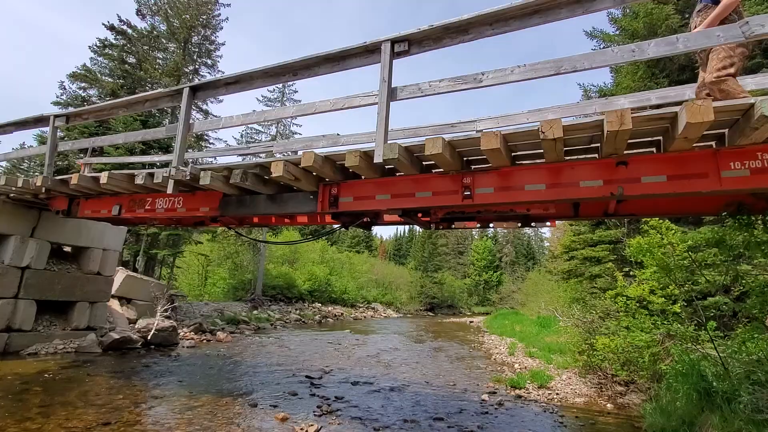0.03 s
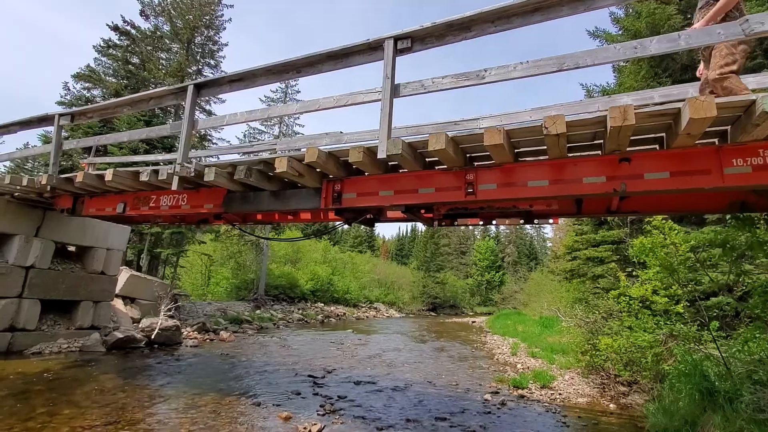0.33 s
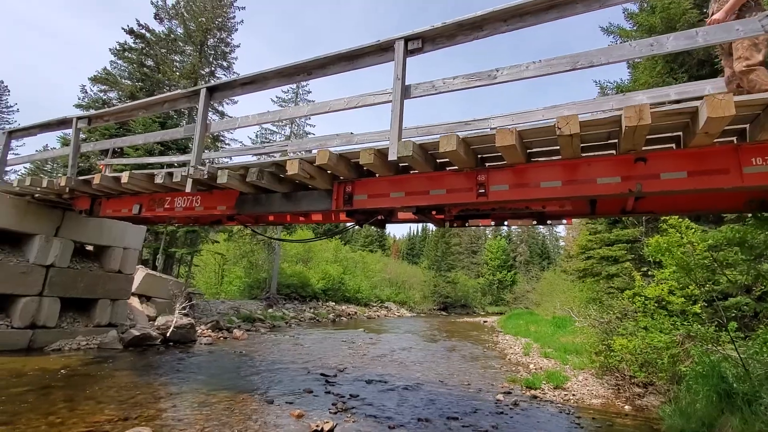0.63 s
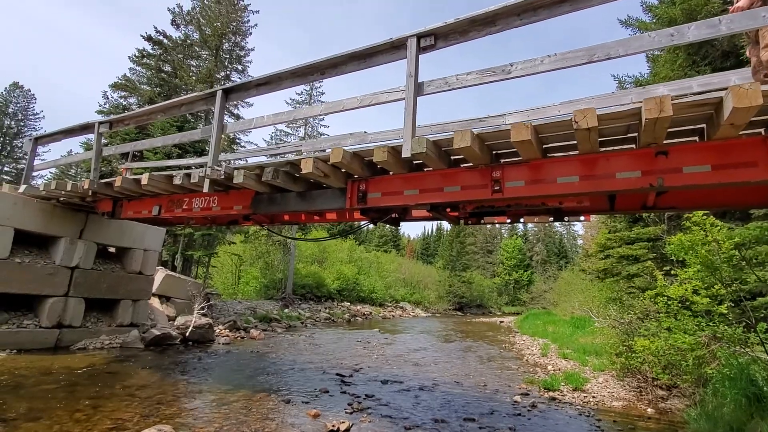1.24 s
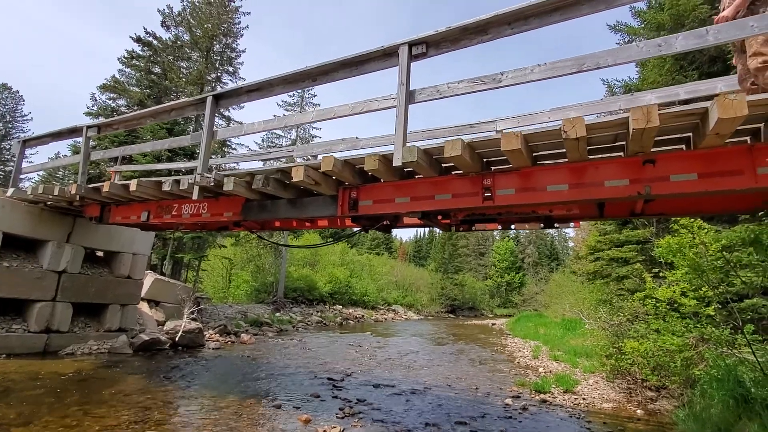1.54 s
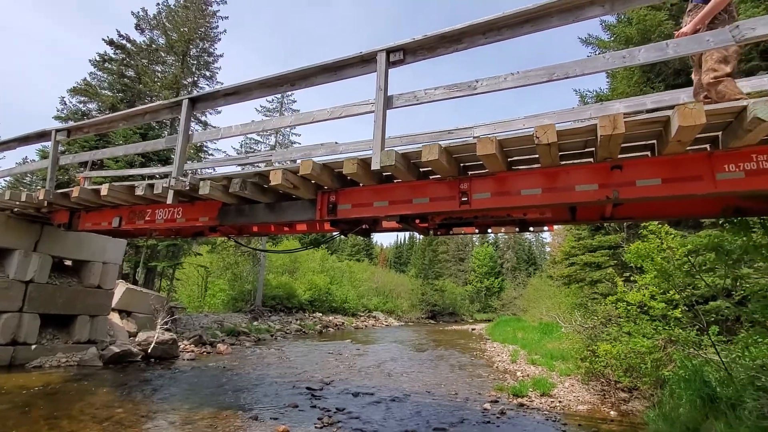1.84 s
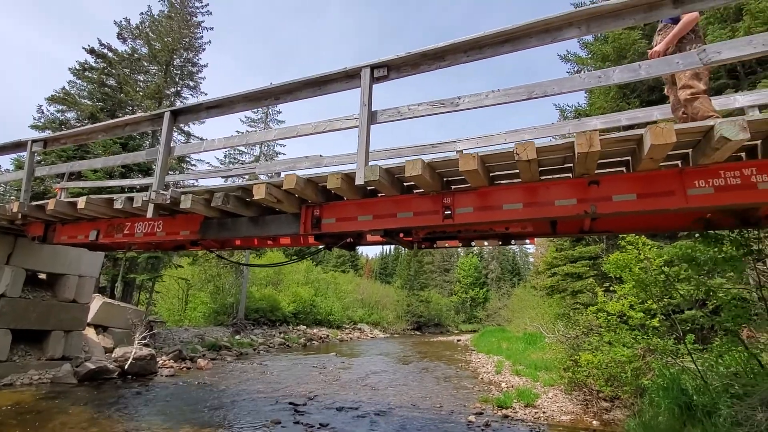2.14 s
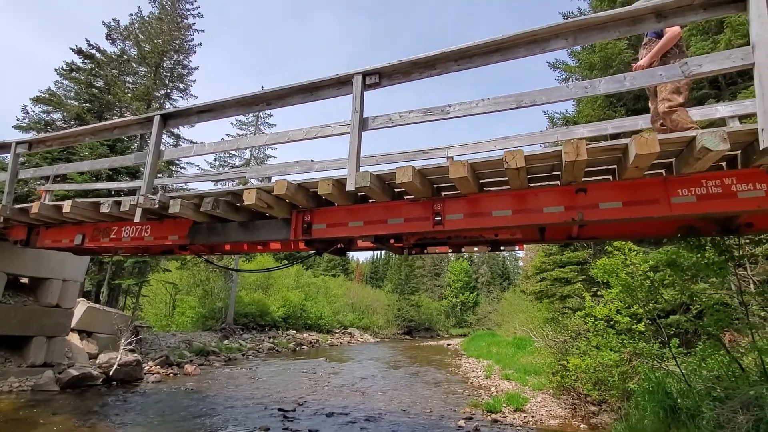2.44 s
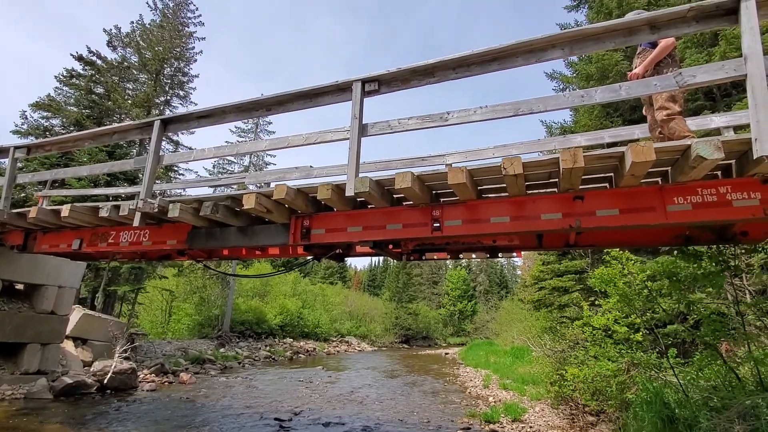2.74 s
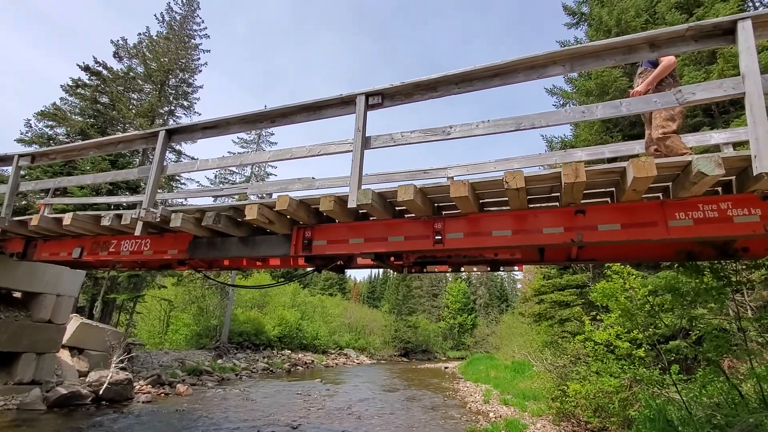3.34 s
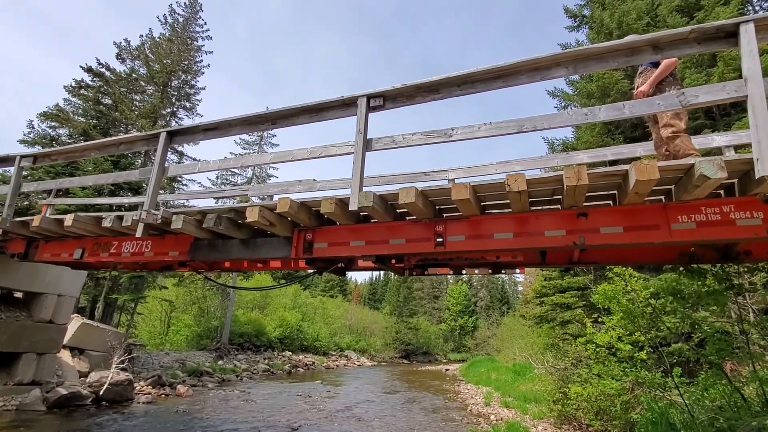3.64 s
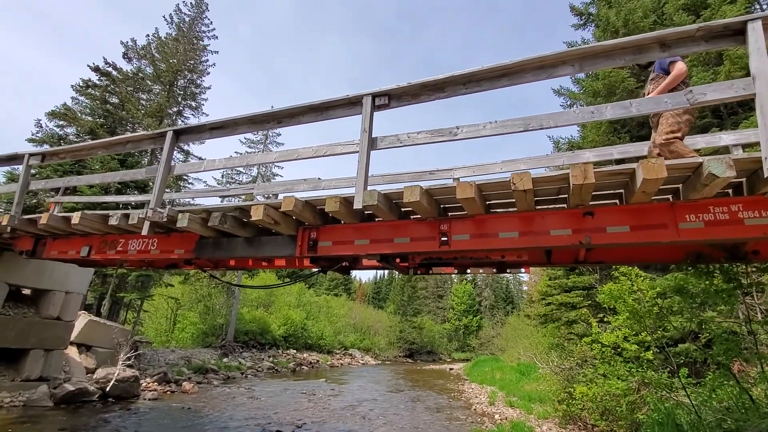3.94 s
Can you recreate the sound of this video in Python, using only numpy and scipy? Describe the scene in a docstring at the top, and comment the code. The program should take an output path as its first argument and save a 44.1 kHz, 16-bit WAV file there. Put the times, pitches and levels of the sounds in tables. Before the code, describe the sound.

A shallow stream ripples over stones throughout, a steady rush with small bubbles and spray. Light wind rumbles and thumps on the microphone, and a faint high hiss, perhaps an insect, pulses twice a second. Sharp close taps come at about 0.8, 1.6 and 2.6 seconds, the second loudest. A distant bird calls thinly three times around 2 seconds, then a small bird whistles high from 3.1 to 3.9.

```python
"""Under a bridge, a shallow stream ripples over stones: a rush full of ringing bubbles and ticks of
spray. Light wind rumbles and thumps on the two microphone openings. A faint high hiss, perhaps an
insect, pulses twice a second, and three sharp taps sound close by. A far bird gives three thin calls,
then a small bird whistles one high phrase near the end."""
import sys
import numpy as np
from scipy import signal
from scipy.fft import rfft, irfft, next_fast_len
from scipy.io import wavfile
from scipy.ndimage import uniform_filter1d, map_coordinates

SR = 44100
rng = np.random.default_rng(int(sys.argv[2]) if len(sys.argv) > 2 else 0)


def digitize_waveform(pressure):
    """Quantize a signal to 16-bit integers and store it at the path in sys.argv[1].

    Rows of a 2-D input are taken as channels; values are limited to [-1, 1].
    """
    field = np.atleast_2d(pressure).T
    bounded = np.clip(field, -1, 1)
    quanta = np.round(bounded * 32767).astype(np.int16)
    wavfile.write(sys.argv[1], SR, quanta)


N = 176400
TOP_HZ = 15920  # upper limit of the treble


def amp(db):
    """Turn decibels into a number to multiply by."""
    return 10 ** (np.asarray(db) / 20)


def unit(x):
    """Scale a signal so that its average strength (rms) is 1."""
    return x / np.sqrt(np.mean(x ** 2) + 1e-20)


def along(points, hz, column=1):
    """Read a table between its frequencies, on a scale of octaves."""
    columns = np.transpose(points)
    return np.interp(np.log(hz + 1), np.log(columns[0] + 1), columns[column])


def curves(rows):
    """Join a table's points in time with straight lines, one curve per value column."""
    times, *columns = np.transpose(rows)
    return np.array([np.interp(np.arange(N) / SR, times, column) for column in columns])


def wobble(rate):
    """A smooth curve through `rate` random values a second."""
    return map_coordinates(rng.standard_normal(int(N * rate / SR) + 4), [np.arange(N) * rate / SR])


def filtered(x, response):
    """Change the strength and timing of each frequency in x by response(hz)."""
    size = next_fast_len(N + SR // 2)
    return irfft(rfft(x, size) * response(np.fft.rfftfreq(size, 1 / SR)), size)[..., :N]


def noise(tone):
    """Separate left and right noise, shaped by a table of (frequency [Hz], level [dB])."""
    return unit(filtered(rng.standard_normal((2, N)), lambda hz: amp(along(tone, hz))))


def pan(db):
    """Left and right gains that make the left louder by db."""
    return amp([[db / 2], [-db / 2]])


def fade(t, t60):
    """Die away by 60 dB every t60 seconds."""
    return np.exp(-np.log(1000) * t / t60)


def swell(t, width):
    """A smooth rise and fall, at 61% of its peak `width` seconds either side of t = 0."""
    return np.exp(-(t / width) ** 2 / 2)


def add(out, start, sound):
    """Mix a sound in at `start` seconds."""
    part = out[..., round(start * SR):][..., :sound.shape[-1]]
    part += sound[..., :part.shape[-1]]


def bubble(t, hz, cycles, rise):
    """Trapped air rings for about `cycles` vibrations, its pitch rising as it dies."""
    life = cycles / hz
    ring = np.sin(2 * np.pi * hz * t * (1 + rise * t / life / 2))
    onset = 1 - np.exp(-20 * t / life)
    return ring * fade(t, life) * onset


def bubble_cloud(per_s, hz, spread, cycles, scatter_db, rise, samples):
    """Many tiny bubbles ring at random times, pitches and strengths."""
    draws = np.random.default_rng(rng.integers(2 ** 31)).random((int(per_s * N / SR), 3))
    when, how_high, how_loud = np.hsplit(draws, 3)
    pitch = np.clip(hz * np.exp(spread * (2 * how_high - 1)), 200, TOP_HZ)
    strength = amp(-scatter_db * np.log(1 - .99 * how_loud)) * pitch / hz  # a few stand out
    positions = (when * N).astype(int) + np.arange(samples)
    rings = strength * bubble(np.arange(samples) / SR, pitch, cycles, rise)
    return unit(np.bincount(positions.ravel(), rings.ravel(), N)[:N])


def ripples(patchy_db, bubble_db=-11, spray_db=-6.5):
    """Water breaks over stones: an uneven rush, bubbles and ticks of spray."""
    hiss = signal.stft(rng.standard_normal(N), nperseg=256)[2]  # a grid of frequency by time
    patches = uniform_filter1d(rng.standard_normal(hiss.shape), 5, axis=0)
    patches = unit(uniform_filter1d(patches, 10, axis=1))
    rush = unit(signal.istft(hiss * amp(patchy_db * patches), nperseg=256)[1][:N])
    bubbles = bubble_cloud(per_s=700, hz=1692, spread=1.088, cycles=26, scatter_db=3, rise=0.24,
                           samples=1200)
    spray = bubble_cloud(per_s=500, hz=10000, spread=0.35, cycles=3, scatter_db=4, rise=0, samples=64)
    return unit(rush + amp(bubble_db) * bubbles + amp(spray_db) * spray)


def stream(gain_db=4.5, surge_db=0.41, low_cut_hz=151, fizz_hz=5000, flicker_db=0.97, swell_db=0.63):
    """The main ripples reach the left first; the right also hears other water. The top fizz flickers."""
    # tone of the water (frequency [Hz], left level [dB], right level [dB])
    tone = [(273, -10, -12), (457, 0, -3.5), (935, -1.5, -6), (1510, -2.5, -7), (2140, -3.5, -8),
            (2590, -9.5, -10.5), (3390, -14.5, -14), (4220, -18, -17.5), (5050, -17.5, -25),
            (7010, -19.5, -34.5), (7650, -26.5, -36), (8800, -25, -33), (9500, -23, -24), (11400, -22, -21),
            (13000, -18.5, -28.2), (14300, -16, -29), (15600, -13.5, -49)]
    # rise and fall of the rush (time [s], level [dB])
    flow = [(.2, -45), (.7, -46), (1.2, -44.5), (1.85, -43.5), (2.3, -45), (2.8, -44.5), (3.1, -44.5),
            (3.55, -43), (3.75, -44), (4, -45)]
    # how alike the two sides sound (frequency [Hz], likeness [0 to 1])
    likeness = [(200, 0.67), (450, 0.85), (900, 0.33), (1400, 0.4), (1650, 0.15), (2200, 0.51),
                (2450, 0.38), (2800, 0.57), (3100, 0.46), (3400, 0.086), (15000, 0.12)]
    # how far the left wave runs ahead of the right (frequency [Hz], lead [radians])
    lead = [(100, .3), (450, .95), (700, 1.4), (1150, 3.1), (1600, 4.7), (1750, 6.5), (2300, 7), (2650, 9),
            (3100, 9.5), (6550, 20), (9400, 30), (15700, 51)]
    main, other = ripples(patchy_db=1.4), ripples(patchy_db=3.0)
    shared = filtered(main, lambda hz: along(likeness, hz) * np.exp(-1j * along(lead, hz)))
    separate = filtered(other, lambda hz: np.sqrt(1 - along(likeness, hz) ** 2))
    colour = lambda hz: amp([along(tone, hz, 1), along(tone, hz, 2)]) * hz / np.hypot(hz, low_cut_hz)
    water = unit(filtered(np.array([main, shared + separate]), colour))
    fizz = filtered(water, lambda hz: 1 - np.exp(-(hz / fizz_hz) ** 2))
    flicker = amp(flicker_db * wobble(110) + swell_db * wobble(20))
    loudness = amp(gain_db + curves(flow) + surge_db * wobble(14))
    return (water + (flicker - 1) * fizz) * loudness


def wind(rumble_db=-0.5, lumpy_db=2.0, flutter_right_db=-15):
    """Air buffets the microphone openings: a lumpy rumble, with a higher flutter in the gusts."""
    # tone of the rumble (frequency [Hz], level [dB])
    rumble_tone = [(20, -30), (30, -18), (40, -3.5), (52, 0), (75, 2), (105, -4), (140, -14), (200, -21.5),
                   (300, -31), (600, -58), (2000, -110)]
    # strength of the wind (time [s], left level [dB], right level [dB])
    strength = [(0.16, -27, -30.5), (0.45, -27.5, -33), (0.62, -28, -40.5), (0.85, -29.5, -32),
                (1.1, -33.5, -37.5), (1.35, -25.5, -28), (1.55, -28.5, -27), (1.75, -34.5, -34.5),
                (1.92, -21, -34.5), (2.2, -39.5, -31.5), (2.5, -34.5, -42.5), (2.78, -48, -57),
                (2.84, -26, -46), (3.0, -36, -39.5), (3.17, -25, -23.5), (3.42, -29, -30.5),
                (3.67, -28, -22), (3.85, -26.5, -27.5), (4.0, -20, -33.9)]
    # tone of the flutter (frequency [Hz], level [dB])
    flutter_tone = [(60, -34), (130, -10.5), (190, 2), (280, -1), (380, -10), (700, -40), (2000, -80)]
    # stronger gusts (time [s], half length [s], level [dB])
    gusts = [(0.42, 0.013, -33.5), (1.097, 0.023, -39), (1.87, 0.036, -35.5), (2.021, 0.02, -37.5),
             (3.15, .04, -41.5), (3.664, 0.018, -27), (3.933, 0.025, -37)]
    t = np.arange(N) / SR
    rumble = noise(rumble_tone)
    lumps = lumpy_db * np.array([wobble(25.14), wobble(24.89)])
    rumble *= amp(rumble_db + curves(strength) + lumps)
    flutter = noise(flutter_tone) * sum(amp(db) * swell(t - time, width) for time, width, db in gusts)
    return rumble + flutter * amp([[0], [flutter_right_db]])


def wind_thumps(width_s=0.0045, lag_s=0.0015, other_side_db=-21):
    """Small swirls of air each hit one opening with a round thump; the other gets only a little."""
    # swirls (time [s], side [L or R], level [dB], pitch [Hz])
    swirls = [(.2739, "L", -14.5, 134), (0.2849, "L", -13, 110), (0.406, "R", -15.5, 96.5),
              (.413, "L", -21.5, 170), (.4863, "L", -15.5, 112), (.511, "L", -18.5, 89),
              (.523, "L", -21, 85), (.793, "L", -14.5, 102), (0.853, "R", -20.5, 72),
              (.867, "L", -16.5, 75), (0.926, "L", -16, 74), (1.287, "R", -22, 91), (1.345, "L", -15, 75),
              (1.361, "L", -16.5, 75), (1.526, "R", -18, 80), (1.855, "L", -26, 243),
              (1.912, "L", -20, 125), (1.951, "L", -16.5, 94), (2.014, "L", -10.5, 101),
              (2.035, "L", -12, 96), (2.92, "L", -21, 103), (3.1131, "L", -11, 112),
              (3.1248, "L", -8.5, 77.5), (3.551, "R", -9.5, 103), (3.648, "L", -16.5, 152),
              (3.6629, "L", -13.5, 120), (3.682, "L", -16, 143), (3.698, "R", -12, 95),
              (3.831, "L", -20, 80)]
    out, t = np.zeros((2, N)), np.arange(-(SR // 20), SR // 20) / SR
    for time, hit_side, db, hz in swirls:
        gains = amp([[db + other_side_db * (side != hit_side)] for side in "LR"])
        thump = np.cos(2 * np.pi * hz * t) * swell(t - lag_s, width_s)
        add(out, time + t[0], gains * thump)
    return out


def plops():
    """Single nearer bubbles ring out above the rush."""
    # near bubbles (time [s], starting pitch [Hz], level [dB])
    near_bubbles = [(.195, 970, -33.5), (.243, 1730, -30.5), (.3345, 2045, -26), (1.735, 1990, -33),
                    (3.64, 882, -31.5)]
    out, t = np.zeros(N), np.arange(SR // 10) / SR
    for start, hz, db in near_bubbles:
        add(out, start, amp(db) * bubble(t, hz, cycles=49, rise=0.31))
    return out * pan(db=7.5)


def insect(first_s=0.327, period_s=.498, width_s=0.036, gain_db=-57):
    """A thin high hiss, perhaps an insect, comes in soft, evenly spaced pulses."""
    # tone of the hiss (frequency [Hz], level [dB])
    tone = [(9000, -40), (11000, -8), (12000, -1), (13000, -0.5), (14200, -9), (16000, -30)]
    # how the pulses grow and shrink (time [s], level change [dB])
    strength = [(.33, 1.5), (.83, 2.5), (1.32, 5), (1.82, 3), (2.82, 0), (3.32, 1), (3.82, 4)]
    from_peak_s = (np.arange(N) / SR - first_s + period_s / 2) % period_s - period_s / 2
    pulses = noise(tone) * swell(from_peak_s, width_s)
    return amp(gain_db + curves(strength)) * pulses * pan(db=5.5)


def taps(snap_hz=6000, snap_db=-6, dull_above_hz=7200, dull_db=-8):
    """Tiny dry contacts: a bright tick and a high snap over a short, lower knock."""
    # taps (time [s], left level [dB], right level [dB], tick pitch [Hz],
    #       knock level against the tick [dB], knock pitch [Hz])
    contacts = [(0.8274, -20, -33, 5260, 3.5, 1490), (1.5875, -11, -38, 3400, -3.5, 750),
                (2.5737, -29, -42, 6330, -15, 1400)]
    out, t = np.zeros((2, N)), np.arange(SR // 50) / SR
    ring = lambda hz, t60: np.sin(2 * np.pi * hz * t) * fade(t, t60)
    for start, left_db, right_db, tick_hz, knock_db, knock_hz in contacts:
        tick = ring(tick_hz, t60=0.002)
        snap = amp(snap_db) * ring(snap_hz, t60=0.0019)
        knock = amp(knock_db) * ring(knock_hz, t60=0.0029)
        add(out, start, amp([[left_db], [right_db]]) * (tick + snap + knock))
    return filtered(out, lambda hz: amp(dull_db / (1 + (dull_above_hz / (hz + 1)) ** 20)))


def birds(gain_db=-3.2, quaver=.0095, shiver_db=2.4, note_fade_db=3.3, echo_db=-4.5):
    """Thin, trembling whistles, some overlapping, with a short echo from the trees."""
    # the far bird's calls (time [s], length [s], level [dB], pitch [Hz])
    far_calls = [(1.761, 0.09, -59.5, 5700), (2.077, 0.095, -61, 5600), (2.329, 0.076, -60, 5320)]
    # the closing phrase (time [s], length [s], level [dB], five pitches from start to end [Hz])
    phrase = [(3.078, .098, -55.5, 8380, 8340, 8520, 8500, 7600),
              (3.213, .157, -54, 8560, 8200, 7470, 7470, 7950),
              (3.392, .112, -51, 8500, 8620, 8780, 8780, 7150),
              (3.405, .1, -52, 6850, 6180, 5860, 5580, 5200),
              (3.545, .14, -52.5, 8850, 8220, 7600, 7480, 7950),
              (3.586, .126, -49, 6650, 5950, 5680, 5200, 3900),
              (3.745, .135, -47, 6520, 6550, 6620, 6800, 7130)]
    song = np.zeros(N)
    for start, length, db, *pitches in phrase + far_calls:
        samples = int(length * SR)
        progress = np.linspace(0, 1, samples)
        glide = np.polyfit(np.linspace(0, 1, len(pitches)), pitches, len(pitches) - 1)
        hz = np.polyval(glide, progress) * (1 + quaver * wobble(297.5)[:samples])
        whistle = np.sin(2 * np.pi * np.cumsum(hz) / SR)
        loudness = amp(gain_db + db - note_fade_db * progress + shiver_db * wobble(128)[:samples])
        soft_ends = signal.windows.tukey(samples, .14)
        add(song, start, loudness * soft_ends * whistle)
    tail = rng.standard_normal((2, SR // 2)) * fade(np.arange(SR // 2) / SR, t60=0.58)
    echo = signal.fftconvolve(song[None], tail / np.linalg.norm(tail[0]), axes=1)[:, :N]
    return (song + amp(echo_db) * echo) * pan(db=12)


def scene():
    """Everything heard from the bank."""
    return stream() + wind() + wind_thumps() + plops() + taps() + birds() + insect()


def record(dry):
    """The sound starts after a brief silence, and the very highest treble is cut off."""
    silence_s = .156
    started = np.arange(N) / SR > silence_s
    return filtered(dry * started, lambda hz: 1 / (1 + (hz / TOP_HZ) ** 400))


dry = scene()
out = record(dry)
digitize_waveform(out)
```